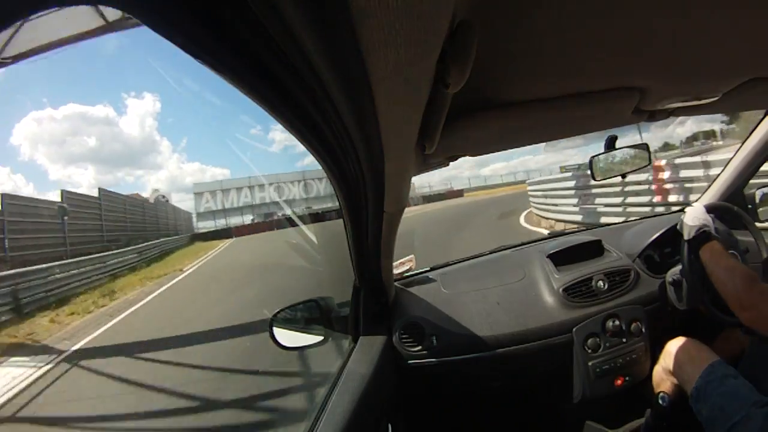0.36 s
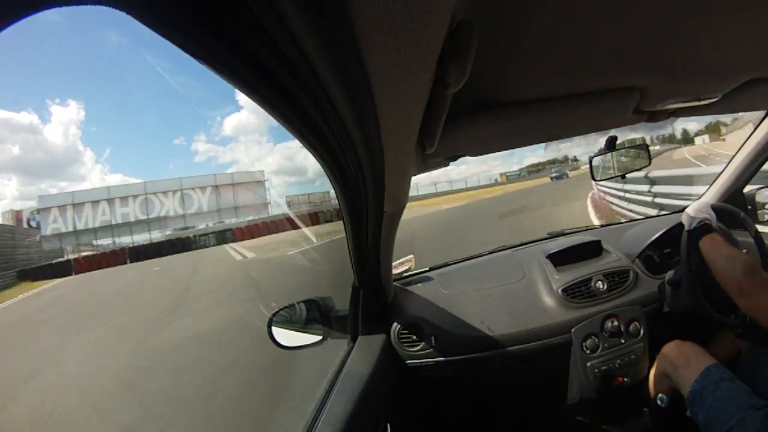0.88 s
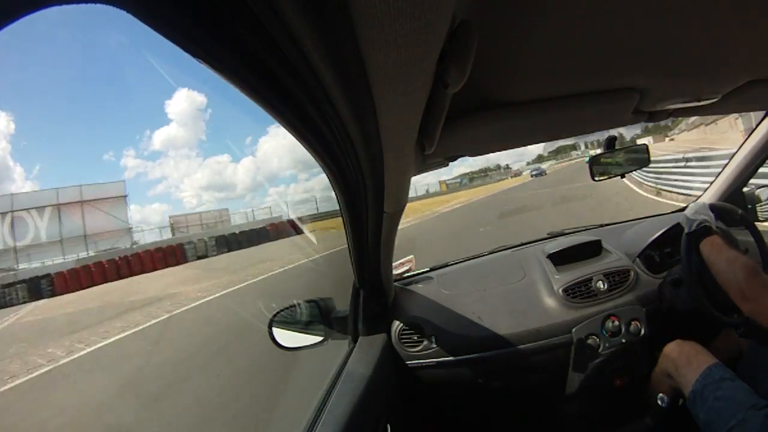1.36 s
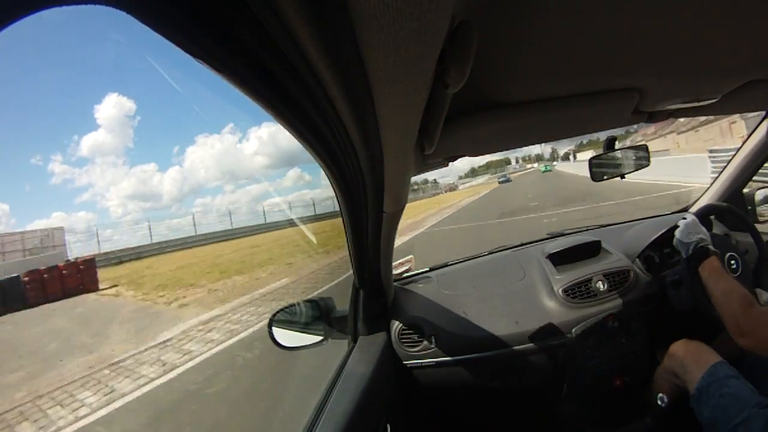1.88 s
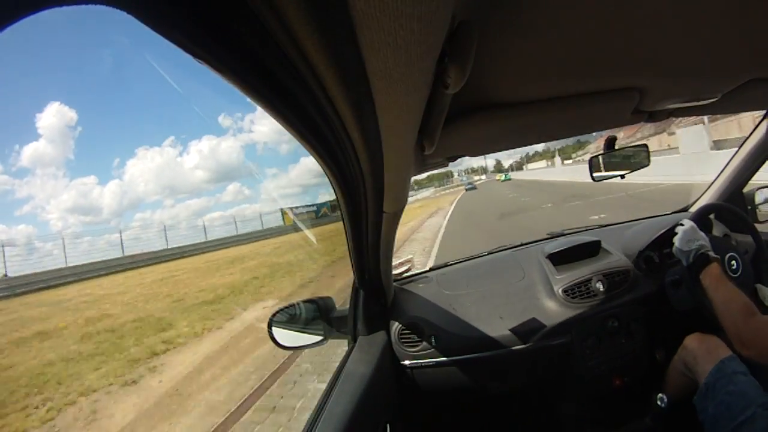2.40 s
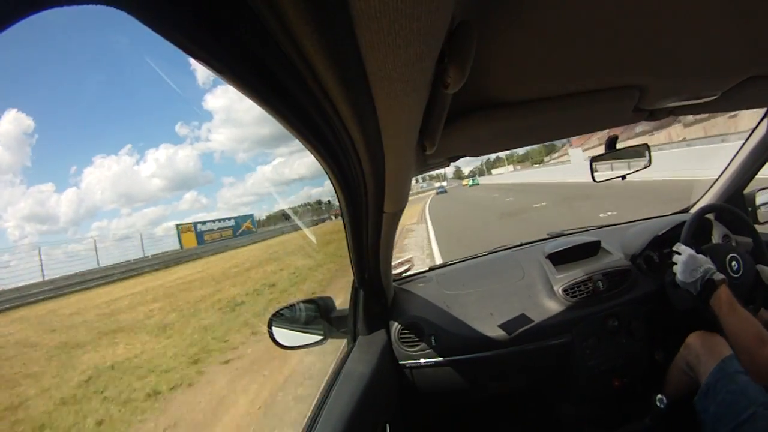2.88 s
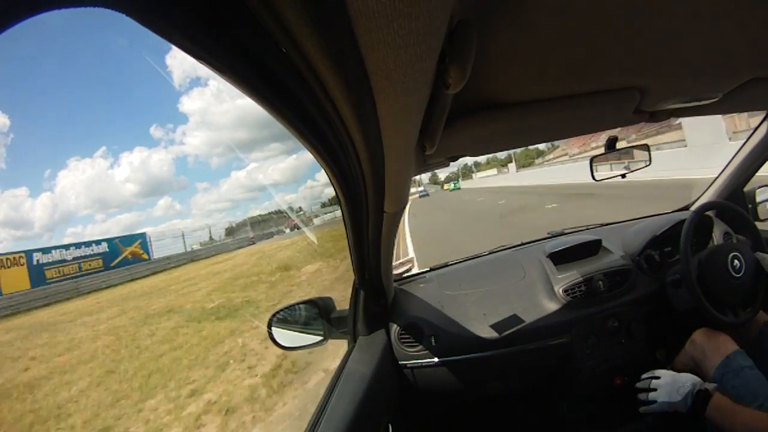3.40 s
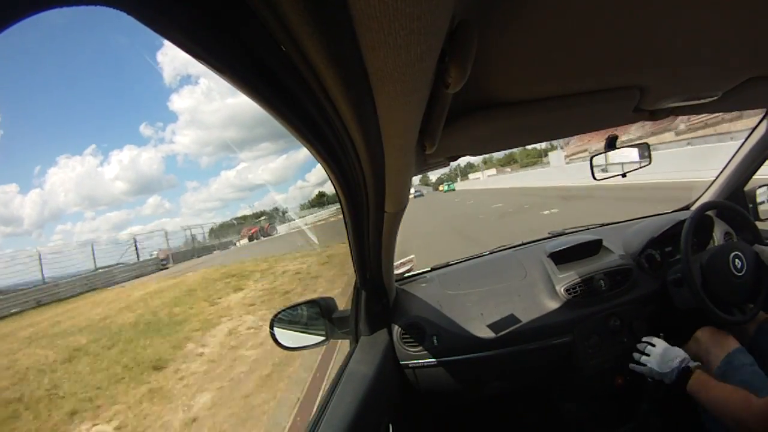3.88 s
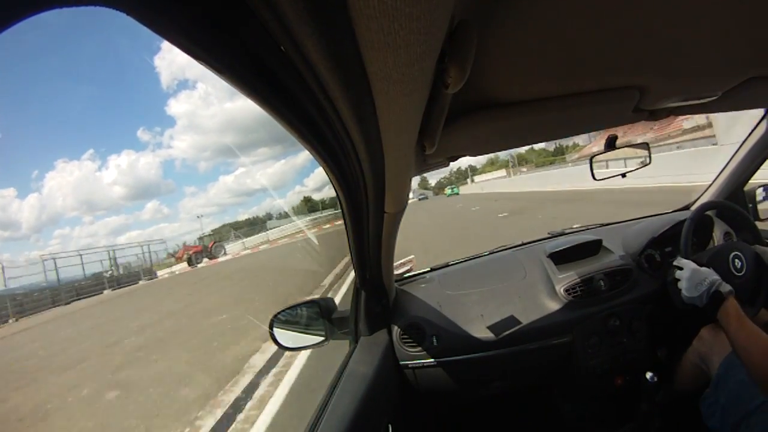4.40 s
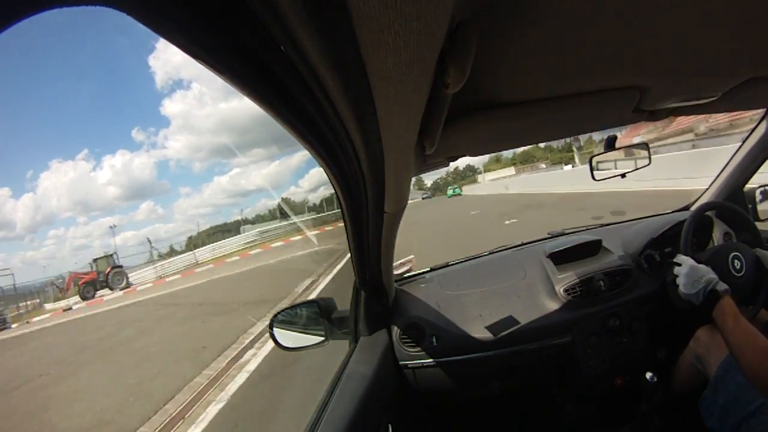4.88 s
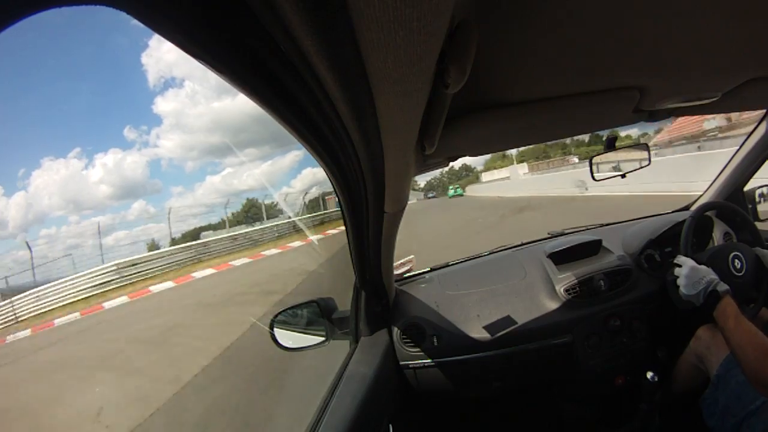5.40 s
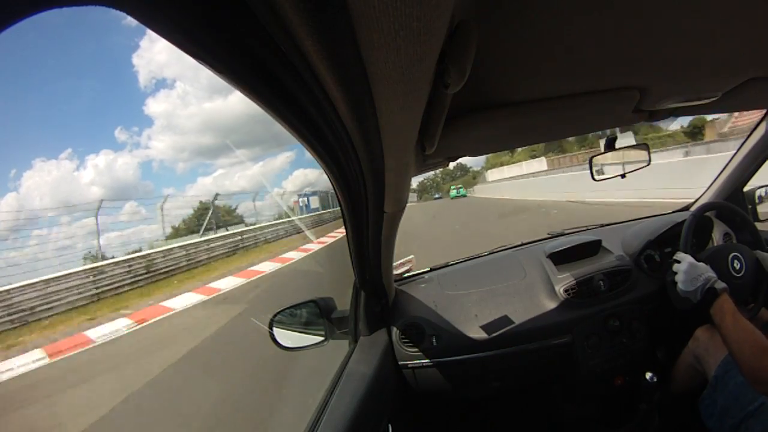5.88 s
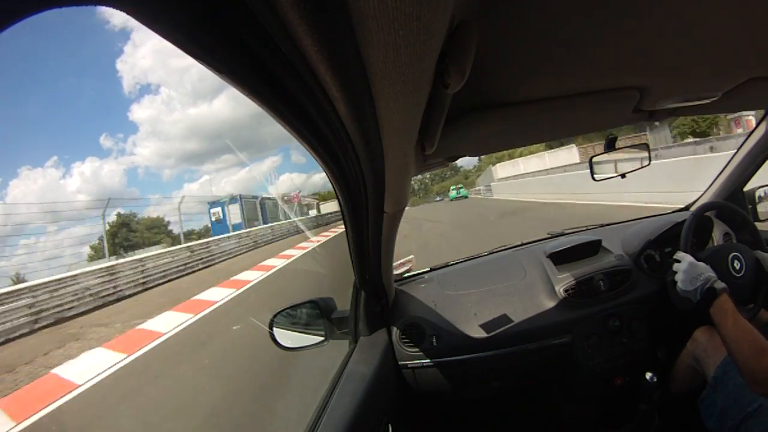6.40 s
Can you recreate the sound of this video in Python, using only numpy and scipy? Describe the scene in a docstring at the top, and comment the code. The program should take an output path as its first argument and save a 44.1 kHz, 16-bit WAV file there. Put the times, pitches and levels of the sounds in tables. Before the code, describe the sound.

Boomy four-cylinder engine revs upward in a car cabin, with a buzzing kerb rattle midway, a quick upshift, and another hard climb.

```python
"""A four-cylinder engine booms through a small car driven flat out: it climbs, is shifted up, climbs again.
Sines at multiples of the crankshaft speed make its orders; coloured noise makes rasp, road and wind.
The wheels cross a ribbed kerb: a low harmonic hum, and a loosely mounted housing rattles in dying modes.
Floor thumps, grit on the bodywork and thin trim ticks lie beneath. One microphone, nearly mono."""
import sys
import numpy as np
from scipy import signal
from scipy.io import wavfile
from scipy.ndimage import uniform_filter1d

SR = 44100
rng = np.random.default_rng(int(sys.argv[2]) if len(sys.argv) > 2 else 0)


def wav_record(signal):
    """Record a signal, one row per channel, as 16-bit PCM in the file named by sys.argv[1]."""
    frames = np.transpose(np.atleast_2d(signal))
    bounded = np.clip(frames, -1, 1)
    # unit amplitude maps onto the largest positive 16-bit level
    quanta = np.round(bounded * 32767).astype(np.int16)
    wavfile.write(sys.argv[1], SR, quanta)


def amplitude_ratio(level_db):
    """Convert a level in decibels to the matching linear amplitude (field) ratio."""
    exponent = np.asarray(level_db, float) / 20
    return 10 ** exponent


N = 287973
T = np.arange(N) / SR


def evened(x):
    """Scales to rms 1."""
    return x / np.sqrt(np.mean(x ** 2) + 1e-20)


def read(points, hz):
    """Interpolates a spectrum over log frequency."""
    point_hz, value = np.transpose(points)
    return np.interp(np.log(hz + 1), np.log(point_hz + 1), value)


def columns(rows):
    """Interpolates every column of a curve at each sample."""
    time_s, *values = np.transpose(rows)
    return [np.interp(T, time_s, value) for value in values]


def add(mix, start_s, sound):
    """Mixes a sound in at start_s."""
    part = mix[round(start_s * SR):][:len(sound)]
    part += sound[:len(part)]


def span(start_s, end_s, fade_s):
    """1 between two times, with soft edges."""
    return np.clip(np.minimum(T - start_s, end_s - T) / fade_s + 0.5, 0, 1)


def drift(top_hz):
    """Slow random curve of rms about 1, up to about top_hz."""
    knots = rng.standard_normal(800)
    return np.interp(T * 2 * top_hz, np.arange(800), knots) * np.sqrt(3 / 2)


def noise(shape_db, size, patchy_db):
    """Noise shaped in short-time spectra, with drifting patches, rms 1."""
    hz = np.fft.rfftfreq(size, 1 / SR)
    real, imag, patches = rng.standard_normal((4 * N // size + 5, len(hz), 3)).T
    patches = uniform_filter1d(patches, size=9, axis=0)
    patches = evened(uniform_filter1d(patches, size=7, axis=1))
    spectra = (real + 1j * imag) * amplitude_ratio(shape_db(hz)[:, None] + patchy_db * patches)
    return evened(signal.istft(spectra, nperseg=size, noverlap=3 * size // 4)[1][:N])


def tone(turns, rms_db, waver_db, waver_hz, slip_turns):
    """A sine whose level wavers around rms_db and whose phase wanders."""
    level = np.sqrt(2) * amplitude_ratio(rms_db + waver_db * drift(waver_hz))
    return level * np.cos(2 * np.pi * (turns + slip_turns * drift(waver_hz)))


def ring(modes, t):
    """Impulse response of a few exponentially dying modes with a soft start."""
    out = 0
    for hz, db, t60_s in modes:
        out = out + amplitude_ratio(db - 60 * t / t60_s) * np.sin(2 * np.pi * hz * t)
    return out * np.tanh(t / 0.00022) ** 2


# cabin and panel resonances: pitch_hz, width_hz, gain_db
CABIN_MODES = [(110, 14, 0), (226, 13, -3), (305, 19, -3.5), (323, 49, -1.5), (417, 52, -6),
               (494, 32, -1.5), (676, 8.9, -7), (980, 53, -11), (1340, 49, -6)]


def cabin_db(hz, valley_db):
    """Cabin gain: the power of its resonances summed over a flat valley."""
    power = amplitude_ratio(2 * valley_db)
    for mode_hz, width_hz, db in CABIN_MODES:
        power = power + amplitude_ratio(2 * db) / (1 + (2 * (hz - mode_hz) / width_hz) ** 2)
    return 10 * np.log10(power)


# intake spectrum: pitch_hz, relative_db_per_hz
RASP_SPECTRUM = [(500, -42.5), (800, -11), (970, 2.5), (1350, 4.5), (1750, -6.5), (2600, -18.5),
                 (5000, -57.5)]


def intake_rasp(firing):
    """The intake gulps noise once a firing, unevenly; rms 1."""
    puffs = (1 + firing) ** 2 * amplitude_ratio(1.3 * drift(50))
    return evened(puffs * noise(lambda hz: read(RASP_SPECTRUM, hz), size=1024, patchy_db=3.0))


# main orders, third and fourth before throttle loss: time_s, shaft_hz, firing_db, third_db, fourth_db
ENGINE_CURVE = [(0.0, 94.76, -36.5, -58, -54), (0.35, 97, -39.5, -62.5, -51), (0.8, 99.2, -33, -54.5, -48),
                (1.1, 102.4, -40.5, -67, -56), (1.3, 105.6, -57, -56, -61), (1.55, 106.4, -52, -55, -57),
                (1.68, 108.6, -42, -42, -47), (1.8, 108.4, -43.5, -57, -57), (1.93, 110.6, -40, -39, -41.5),
                (2.05, 111.5, -37, -47, -39), (2.2, 113.3, -48, -37, -61), (2.3, 113.4, -39.5, -40, -44),
                (2.45, 116.1, -71, -53, -59), (2.7, 117, -39.5, -51, -38.5), (2.9, 118.6, -62, -53, -79),
                (3.55, 120.5, -55, -61, -47), (3.68, 117.4, -51, -58, -50.5),
                (3.76, 114.1, -52.5, -63, -57), (3.87, 110.8, -46.5, -58, -52),
                (3.96, 106.5, -59.5, -67, -43), (4.04, 101.1, -43, -70, -57), (4.09, 91.6, -36.5, -61, -49),
                (4.15, 85, -52, -77, -48), (4.22, 90.15, -36.5, -53, -53.5),
                (4.3, 90.96, -37.5, -51.5, -51), (4.7, 93.16, -36.5, -55.5, -52.5),
                (4.9, 94.45, -29.5, -48, -43.5), (5.25, 96.47, -31.5, -50.5, -57.5),
                (5.45, 97.34, -34.5, -48, -62), (5.6, 97.74, -35.5, -46.5, -41.5),
                (5.87, 99.76, -33.5, -52, -38), (6.15, 101.3, -37, -50, -44.5),
                (6.42, 103.8, -37.5, -42.5, -38.5), (6.53, 102.4, -44.5, -59, -53)]
# base of the small orders and three others, fifth and tenth before throttle loss:
# time_s, effort_db, shaft_db, fifth_db, tenth_db
EFFORT_CURVE = [(0, -67, -53, -70.5, -81), (.4, -64, -56, -59, -71), (.76, -56.5, -50, -53.5, -66),
                (1.1, -58.5, -51, -55.5, -67), (1.3, -58, -52, -66, -69), (1.55, -58.5, -58, -70, -71),
                (2.2, -47, -44, -58, -64), (2.45, -53.5, -57, -66, -68), (2.75, -55, -50, -69, -67),
                (3.6, -64, -58, -61, -79), (4.2, -63, -66.5, -66.5, -80.5),
                (4.65, -57.5, -60.5, -68.5, -69), (4.85, -50, -56.5, -52, -61.5),
                (5.28, -50, -58, -48, -60.5), (5.45, -52.5, -57, -61, -59.5),
                (5.8, -45.5, -50.5, -48, -61.5), (6.1, -50, -46.5, -48, -62),
                (6.35, -46.5, -57, -56, -59.5), (6.53, -50, -55, -62, -62)]
# strongest half orders from unequal cylinders, before throttle loss: time_s, order_2_5_db, order_4_5_db
HALF_ORDERS = [(0, -71, -62.5), (.6, -59, -64.5), (1.1, -59, -60), (1.5, -62, -56.5), (1.62, -56, -48.5),
               (1.9, -51, -48), (2.2, -41, -49), (2.4, -46, -56), (2.75, -46, -64), (3.4, -51.5, -56),
               (3.8, -59.5, -63), (4.2, -53.5, -65), (4.6, -48, -62.5), (4.95, -43, -54.5),
               (5.4, -49.5, -54.5), (5.8, -48, -53), (6.15, -52, -49), (6.53, -53, -50)]
# small orders against effort_db, before the cabin: shaft_multiple, relative_db
SMALL_ORDERS = [(1.5, -4.5), (3.5, 1.5), (5.5, 0.5), (6.5, -4.5), (7, -2.5), (7.5, -6), (8, -3), (8.5, -6),
                (9, -8), (9.5, -4), (11, -15), (12, -8), (14, -10.5), (16, -20.5), (18, -16.5), (20, -24)]


def engine():
    """Sines at multiples of the crankshaft speed plus intake rasp; also returns the beat of the firings."""
    shaft_hz, firing_db, third_db, fourth_db = columns(ENGINE_CURVE)
    effort_db, shaft_db, fifth_db, tenth_db = columns(EFFORT_CURVE)
    half_low_db, half_high_db = columns(HALF_ORDERS)
    turns = np.cumsum(shaft_hz) / SR
    # a panel sings along with the sixth order near one shaft speed
    panel_db = 5.5 / (1 + (2 * (shaft_hz - 112.3) / 2.9) ** 2)
    sixth_db = effort_db + panel_db - 6.5
    # off throttle the shaft slows and the firings blur
    falling_hz_per_s = -uniform_filter1d(np.gradient(shaft_hz) * SR, size=4000)
    blur = 1 + np.clip(falling_hz_per_s / 26, 0, 2.5)

    out = tone(2 * turns, firing_db, waver_db=0.9 * blur ** 1.4, waver_hz=15, slip_turns=0.011 * blur ** 1.6)
    out += tone(4 * turns, fourth_db - 2 * blur + 1, waver_db=1.5, waver_hz=14, slip_turns=0.035 * blur)
    out += tone(turns, shaft_db, waver_db=2.6, waver_hz=12, slip_turns=0.08)  # comes in lumps
    middle_orders = [(2.5, half_low_db), (3, third_db), (4.5, half_high_db),
                     (5, fifth_db), (6, sixth_db), (10, tenth_db)]
    for order, db in middle_orders:
        out += tone(order * turns + rng.random(), db - 0.75 * blur,
                    waver_db=1.5, waver_hz=12, slip_turns=0.03 * blur)
    for order, db in SMALL_ORDERS:  # coloured as they sweep through the cabin
        level_db = effort_db + db + cabin_db(order * shaft_hz, valley_db=-11.0)
        out += tone(order * turns + rng.random(), level_db,
                    waver_db=2.1, waver_hz=8, slip_turns=(0.022 + 0.0025 * order) * blur)
    firing = np.cos(4 * np.pi * turns)
    return out + amplitude_ratio(effort_db - 11.5) * intake_rasp(firing), firing


# ribs under the tyres: time_s, ribs_hz, hum_db, second_harmonic_db
KERB_CURVE = [(2.58, 61.6, -76, -70), (2.678, 68.27, -41, -33), (2.76, 69.26, -40.5, -54),
              (2.892, 72.52, -30.5, -33.5), (3.006, 73.69, -36, -34), (3.124, 73.34, -38, -30.5),
              (3.282, 74.05, -31.5, -52), (3.396, 74.3, -30.5, -37.5), (3.5, 74.9, -34, -42),
              (3.58, 80.4, -39, -50), (3.666, 79.7, -44.5, -69), (3.72, 79.7, -57, -41),
              (3.84, 78.4, -65, -47.5), (3.93, 81.6, -74.5, -72)]


def kerb_hum():
    """Rib-rate harmonics hum through the body; also returns the count of ribs passed."""
    ribs_hz, hum_db, second_db = columns(KERB_CURVE)
    start_s, end_s = KERB_CURVE[0][0], KERB_CURVE[-1][0]
    turns = np.cumsum(ribs_hz * (T > start_s)) / SR
    out = -tone(turns, hum_db, waver_db=0.7, waver_hz=12, slip_turns=0.012)
    out -= tone(2 * turns, second_db, waver_db=1.5, waver_hz=12, slip_turns=0.028)
    # higher harmonics share a varying strength: sharp downward jolts
    jolt_db = hum_db - 14 + 4 * drift(35)
    for k in range(3, 11):
        out -= tone(k * turns, jolt_db - 1.7 * k, waver_db=1.0, waver_hz=20, slip_turns=0.17)
    return out * span(start_s, end_s, fade_s=0.045), turns


# nominal modes of the housing's shell, base, mount and thin parts: pitch_hz, relative_db, t60_s
SHELL_MODES = [(4100, -11.5, 0.0053), (5900, -14, 0.004), (6310, 1.5, 0.0062), (8430, -4, 0.003)]
BASE_MODES = [(680, 6, 0.0053), (940, 7.5, 0.0028), (1360, -12, 0.0059), (1710, -26, 0.0033)]
MOUNT_MODES = [(2356, -3.5, 0.0082), (2730, 6.5, 0.0033), (3336, 5, 0.0039), (4050, 0.5, 0.0023)]
THIN_MODES = [(9200, -1, .002), (11400, -1, 0.0035), (11900, 5, .0025), (13700, 5, .0025), (14700, 4, .002)]


def knock(ring_db, low_db, clack_db, snap_db):
    """A short scraping contact rings the housing; the microphone is pushed back once."""
    t = T[:700]
    scrape = rng.standard_normal((4, len(t))) + 5 * (t == 0)
    contact = scrape * (amplitude_ratio(-60 * t / 0.0045) + 0.06 * amplitude_ratio(-60 * t / 0.018))
    u = t / (0.0003 * rng.uniform(0.8, 1.5))
    out = -amplitude_ratio(low_db) * u ** 3 * (4 - u) * np.exp(-u) / 2  # the push
    parts = (SHELL_MODES, BASE_MODES, MOUNT_MODES, THIN_MODES)
    peaks_db = (ring_db, low_db - 5.0, clack_db, snap_db)
    for touch, modes, peak_db in zip(contact, parts, peaks_db):
        part = np.convolve(touch, ring(modes, t * rng.uniform(0.95, 1.025)))[:len(t)]
        out += amplitude_ratio(peak_db) * part / abs(part).max()
    burst = rng.standard_normal(len(t)) * amplitude_ratio(-60 * t / 0.0089)
    crack = signal.lfilter(*signal.butter(3, [1200, 9500], "bandpass", fs=SR), burst)
    return out + amplitude_ratio(ring_db - 13) * crack


# how freely the housing chatters: time_s, gain_db
LOOSENESS = [(2.78, -29), (2.85, 1.5), (2.97, 5), (3.13, -1), (3.2, -2), (3.42, 2), (3.55, -2.5),
             (3.66, -19), (3.72, -40)]
# hardest knocks: start_s, ring_db, low_db, snap_db
HARD_KNOCKS = [(2.837, -51, -31, -72), (2.853, -58, -48, -71), (2.866, -52, -28, -72),
               (2.892, -41, -27.5, -62.5), (2.896, -39.5, -26, -62.5), (2.9353, -47, -25.5, -71),
               (2.939, -36, -37, -52.5), (2.947, -35.5, -24, -56.5), (2.9518, -42, -28, -56.5),
               (2.9645, -55, -34, -65), (2.9652, -58, -45, -71), (2.9764, -36.5, -27, -55.5),
               (2.982, -55, -45, -76), (2.9886, -42.5, -26, -60), (2.994, -35, -45, -58),
               (3.0043, -55, -35, -59.5), (3.0177, -44.5, -24, -59.5), (3.022, -48, -25, -55),
               (3.03, -52, -43, -63), (3.045, -52, -43, -71), (3.056, -44, -24, -68.5),
               (3.062, -41.5, -31, -62), (3.0966, -34, -26, -52), (3.1033, -40, -28, -57.5),
               (3.127, -47, -29, -60.5), (3.1311, -35.5, -38, -49.5), (3.137, -44, -26.5, -59),
               (3.1792, -57, -45, -69), (3.2212, -56, -48, -75), (3.226, -44.5, -41, -72.5),
               (3.2352, -56, -42, -69), (3.2487, -55, -43, -69), (3.2608, -39.5, -23.5, -67),
               (3.2665, -45, -41, -70), (3.278, -60, -38, -67), (3.2896, -58, -48, -72),
               (3.317, -58, -40, -72), (3.3353, -47, -44, -65), (3.3414, -45, -24, -69),
               (3.347, -45.5, -22.5, -66), (3.3713, -55, -48, -71), (3.3975, -58, -38, -68),
               (3.409, -52, -30, -64), (3.415, -51, -28.5, -68), (3.4395, -60, -30, -53.5),
               (3.442, -48, -24, -66.5), (3.45, -56, -35, -64), (3.48, -64, -43, -65),
               (3.492, -60, -36, -62), (3.5054, -59, -41, -65), (3.5177, -60, -33, -63),
               (3.533, -57, -50, -62), (3.545, -67, -48, -63), (3.557, -67, -54, -78),
               (3.5966, -66, -48, -72), (3.608, -66, -33.5, -83), (3.6107, -63, -50, -78),
               (3.628, -55.5, -32.5, -82), (3.638, -63, -47, -78), (3.66, -77, -43, -84)]


def rattle(rib_turns):
    """The ribs shake the housing: small random contacts bunch around one firmer knock per rib."""
    phase = rib_turns - 0.8
    loose = amplitude_ratio(columns(LOOSENESS)[0])
    chance = 350 / SR * (1 + np.cos(2 * np.pi * phase)) ** 2
    chatter = amplitude_ratio(-72 + 4.5 * np.minimum(rng.exponential(1, N), 3)) * (rng.random(N) < chance)
    rib = np.diff(np.floor(phase + 0.05 * drift(40)), prepend=0) > 0
    firm = amplitude_ratio(-66 + 4 * rng.standard_normal(N)) * rib
    kind = rng.integers(0, 6, N)  # six random variants of each knock
    out = np.zeros(N)
    for k in range(6):
        small_knock = knock(ring_db=-11.0, low_db=22.0, clack_db=10, snap_db=-10.5)
        firm_knock = knock(ring_db=1.0, low_db=24.0, clack_db=2.5, snap_db=-18.5)
        out += signal.oaconvolve(loose * chatter * (kind == k), small_knock)[:N]
        out += signal.oaconvolve(loose * firm * (kind == k), firm_knock)[:N]
    for start_s, ring_db, low_db, snap_db in HARD_KNOCKS:
        clack_db = ring_db + 0.3 * (low_db - ring_db) + 1  # the mount blends ring and low knock
        add(out, start_s, knock(ring_db, low_db, clack_db, snap_db))
    return out


def gear_lever():
    """The gear lever clicks once, thinly, in the same modes as the thin parts."""
    out = np.zeros(N)
    add(out, 3.987, amplitude_ratio(-62.5) * ring(THIN_MODES, T[:700]))
    return out


# soft floor cycles at road joints: start_s, level_db, pitch_hz, t60_s
JOINT_THUMPS = [(0.195, -23, 101.2, 0.13), (.44, -39.5, 99.4, 0.22), (0.799, -38.5, 97, 0.16),
                (.99, -38, 50.07, 0.15), (2.03, -39, 54.8, 0.11), (2.315, -18, 96.84, 0.12),
                (4.07, -42, 48.2, 0.15), (4.08, -41, 105.6, .1), (5.34, -33, 59.6, 0.11),
                (5.83, -41, 98.75, 0.26), (6.349, -30.5, 110.5, 0.13)]


def thumps():
    """Each road joint gives the floor a few soft, decaying sine cycles."""
    out, t = np.zeros(N), T[:SR // 3]
    for start_s, db, hz, t60_s in JOINT_THUMPS:
        envelope = amplitude_ratio(db - 60 * t / t60_s) * (1 - np.exp(-t / 0.023))
        add(out, start_s, envelope * 2 * np.sin(2 * np.pi * hz * t))
    return out


# wind spectrum: pitch_hz, relative_db_per_hz
WIND_SPECTRUM = [(6000, -39.5), (10000, -5.5), (13000, -1), (15000, -13.5), (16500, -51.5)]


def wind(hiss_db):
    """Wind at the seals: high noise that swells faster than the road hiss."""
    air = noise(lambda hz: read(WIND_SPECTRUM, hz), size=512, patchy_db=-1.5)
    return amplitude_ratio(1.6 * hiss_db + 4.0 + 3.2 * drift(8)) * air


# mean levels: time_s, rumble_db, hiss_db
ROAD_CURVE = [(0.0, -47, -65), (0.38, -47.5, -69), (0.76, -43.5, -61.5), (0.95, -40.5, -65),
              (1.13, -48.5, -65), (1.55, -45.5, -65), (2.2, -43, -56.5), (2.45, -44.5, -62.5),
              (2.75, -48.5, -62.5), (3.2, -49, -64), (3.4, -39, -64.5), (3.64, -42, -65.5),
              (3.73, -60, -67.5), (4.2, -61, -67.5), (4.65, -56.5, -65.5), (4.85, -55, -60),
              (5.28, -52, -58.5), (5.45, -46, -62.5), (5.8, -52, -56.5), (6.1, -54, -58),
              (6.35, -44.5, -55), (6.53, -50, -58)]
# noise spectra, roar before the cabin: pitch_hz, relative_db_per_hz
SHUDDER_SPECTRUM = [(15, -24), (25, -4), (45, 1), (65, -5), (110, -42.5), (200, -87)]
RUMBLE_SPECTRUM = [(30, -51.5), (60, -18.5), (100, 1.5), (125, -13), (160, -4.5), (230, -28.5), (400, -86)]
ROAR_SPECTRUM = [(71, -27.5), (120, -10), (140, -8.5), (190, -6.5), (221, -4), (248, -8), (401, -9.5),
                 (444, -10), (504, -10.5), (618, -18), (860, -22), (964, -24.5), (1120, -26), (2500, -42),
                 (3250, -74.5), (5500, -120)]
HISS_SPECTRUM = [(590, -28.5), (1000, -0.5), (1100, -11), (1350, -9), (1460, -12.5), (2220, -16.5),
                 (2760, -19), (4000, -23.5), (5590, -33), (6140, -30.5), (6810, -35.5), (8190, -35.5),
                 (12000, -41), (14600, -56), (15800, -59.5)]


def road(firing):
    """Shudder, tyre rumble, roar in the cabin resonances, wind, and hiss that flutters with the firings."""
    rumble_db, hiss_db = columns(ROAD_CURVE)
    shudder_db = -59 + 0.68 * (rumble_db + 50)
    roar_db = -45 + (hiss_db + 62) + 7.5 * span(2.854, 3.6, fade_s=0.07)  # louder on the kerb
    shudder = noise(lambda hz: read(SHUDDER_SPECTRUM, hz), size=4096, patchy_db=2.5)
    rumble = noise(lambda hz: read(RUMBLE_SPECTRUM, hz), size=4096, patchy_db=1.5)
    roar = noise(lambda hz: read(ROAR_SPECTRUM, hz) + 0.5 * cabin_db(hz, valley_db=-4.5),
                 size=2048, patchy_db=1.8)
    hiss = noise(lambda hz: read(HISS_SPECTRUM, hz), size=512, patchy_db=-0.23)
    surge_db = drift(9.0)  # the whole body shakes as one on the uneven road
    out = amplitude_ratio(shudder_db + 2.6 * surge_db) * shudder
    out += amplitude_ratio(rumble_db + 0.31 * surge_db) * rumble
    out += amplitude_ratio(roar_db + 0.9 * surge_db) * roar
    out += amplitude_ratio(hiss_db + firing + 0.93 * drift(40)) * hiss
    return out + wind(hiss_db)


# grains on the bodywork: start_s, high_peak_db, low_peak_db
GRIT_TICKS = [(0.051, -63, -71), (.205, -67, -70), (0.276, -48.5, -58), (.321, -64, -68), (.627, -61, -68),
              (1.054, -66, -69), (1.288, -65, -73), (1.515, -65, -70), (1.622, -68, -67), (2.359, -60, -63),
              (5.5508, -56, -63)]
# nominal upper and lower bodywork modes: pitch_hz, relative_db, t60_s
PANEL_HIGH_MODES = [(4800, -2.5, 0.018), (5180, -4, 0.015), (6000, -3.5, .012), (7400, -15, 0.011),
                    (9400, -18, .01)]
PANEL_LOW_MODES = [(2990, 2, .025), (3420, -8, 0.026)]


def grit():
    """Each grain scrapes for a moment and rings the panel."""
    out, t = np.zeros(N), T[:1500]
    for start_s, *peaks_db in GRIT_TICKS:
        for modes, peak_db in zip((PANEL_HIGH_MODES, PANEL_LOW_MODES), peaks_db):
            touch = (rng.standard_normal(len(t)) + 4 * (t == 0)) * amplitude_ratio(-60 * t / 0.0071)
            part = np.convolve(touch, ring(modes, t * rng.uniform(0.89, 1.03)))[:len(t)]
            add(out, start_s, amplitude_ratio(peak_db) * part / abs(part).max())
    return out


# clearest trim ticks, before the band-pass: start_s, level_db
TRIM_TICKS = [(0.082, -68.5), (0.1087, -73), (0.1294, -66), (0.2164, -65), (0.296, -70.5), (0.3376, -69),
              (0.393, -71), (0.4196, -70), (0.466, -68.5), (0.5731, -69.5), (3.7244, -76), (3.7506, -75),
              (3.8363, -70.5), (4.0783, -68), (4.1438, -69.5), (4.1904, -72), (4.2295, -70)]


def ticks():
    """Band-passed noise bursts tick in the trim: clear ones at set times, fainter ones at random."""
    ticks_per_s = 25
    sizes = amplitude_ratio(-75 + 2 * np.minimum(rng.exponential(1, N), 2.5)) * (rng.random(N) < ticks_per_s / SR)
    for start_s, db in TRIM_TICKS:
        sizes[round(start_s * SR)] = amplitude_ratio(db)
    burst = uniform_filter1d(sizes, size=40) * 40 * rng.standard_normal(N)  # 40 samples each
    return signal.lfilter(*signal.butter(2, [4000, 12500], "bandpass", fs=SR), burst)


def scene():
    """All sources at the one microphone, with a soft start."""
    motor, firing = engine()
    hum, rib_turns = kerb_hum()
    mix = motor + hum + rattle(rib_turns) + gear_lever()
    mix += thumps() + road(firing) + grit() + ticks()
    return np.tile(np.minimum(T / 0.004, 1) * mix, (2, 1))


# hiss spectrum: pitch_hz, relative_db_per_hz
SIDE_HISS_SPECTRUM = [(30, -21.5), (80, -11), (143, -8), (194, -8), (387, -5), (461, -5), (1800, -12.5),
                      (5070, -21), (12000, -28.5), (14000, -53)]


def side_hiss():
    """Faint, flickering noise, opposite in the two channels."""
    hiss = noise(lambda hz: read(SIDE_HISS_SPECTRUM, hz), size=1024, patchy_db=7.0)
    hiss = amplitude_ratio(-75 + 2.9 * drift(30)) * hiss
    return np.array([hiss, -hiss])


def band_limit(x):
    """A steep low-pass at the top of the band."""
    return signal.sosfilt(signal.butter(12, 15980, fs=SR, output="sos"), x)


def record(dry):
    """The two channels differ only by the side hiss before the last step."""
    mix = dry + side_hiss()
    return band_limit(mix)


dry = scene()
out = record(dry)
wav_record(out)
```